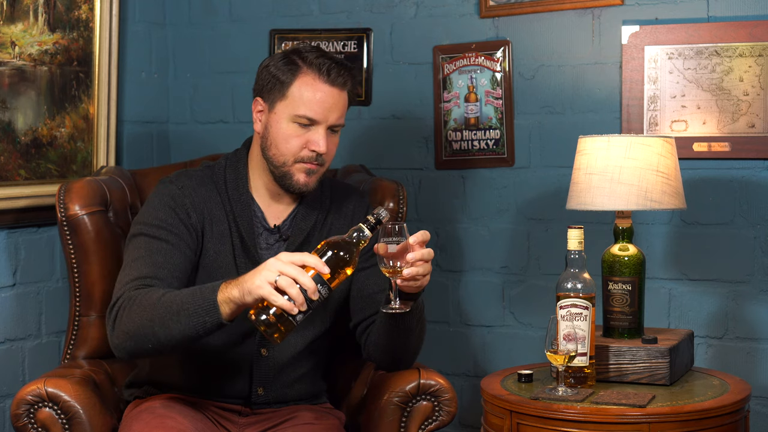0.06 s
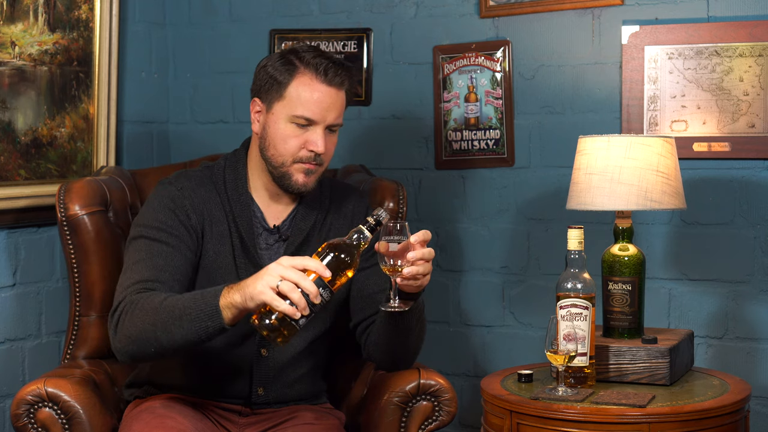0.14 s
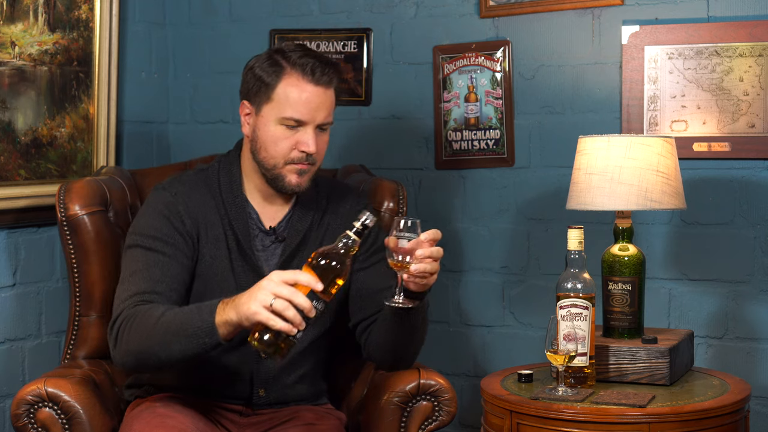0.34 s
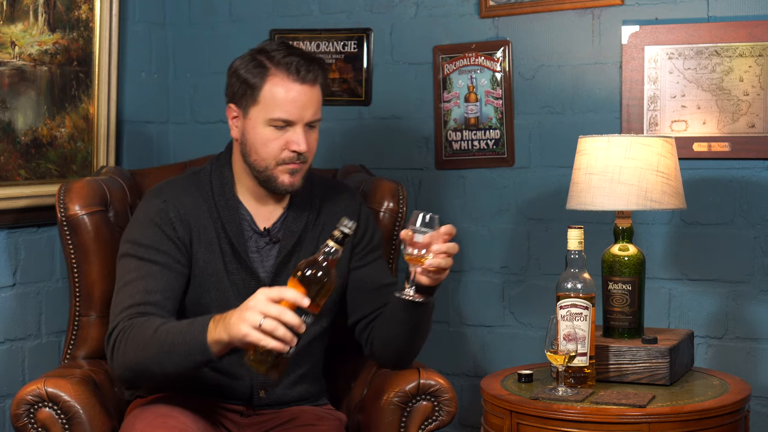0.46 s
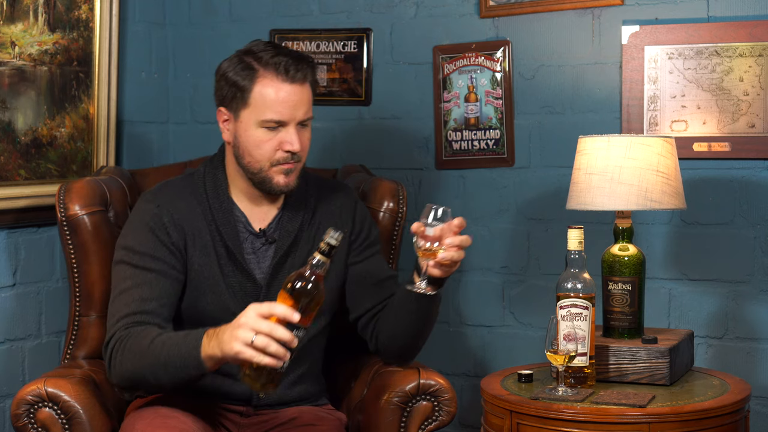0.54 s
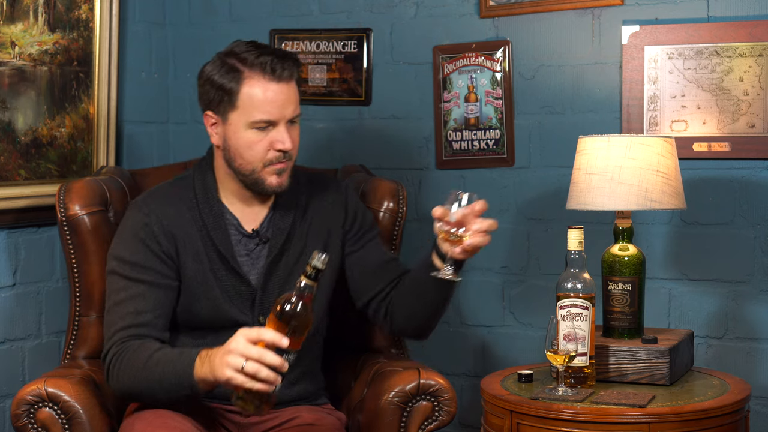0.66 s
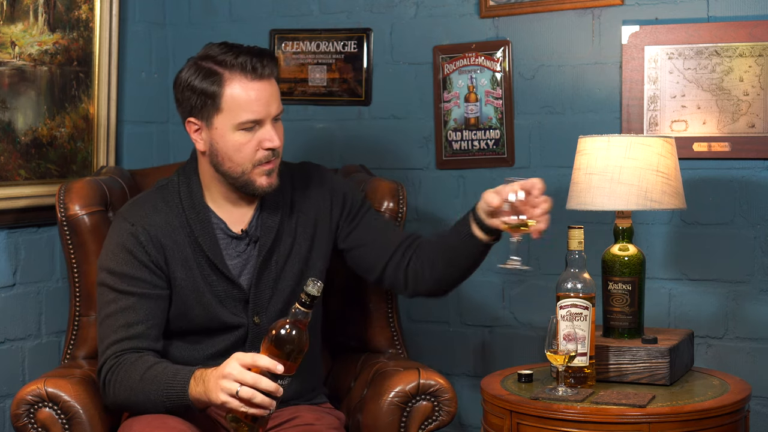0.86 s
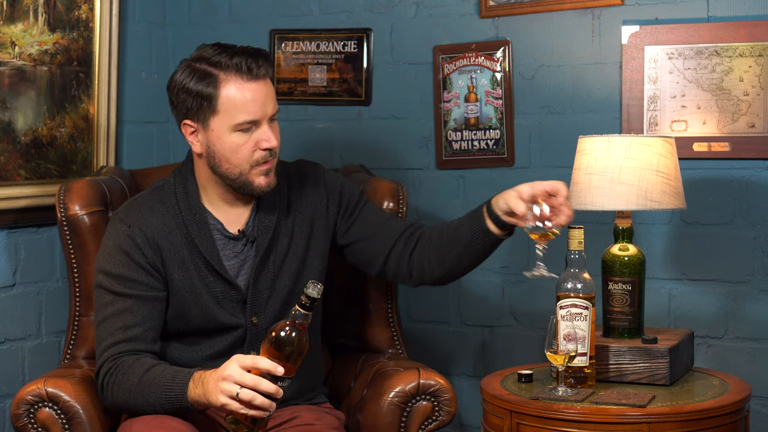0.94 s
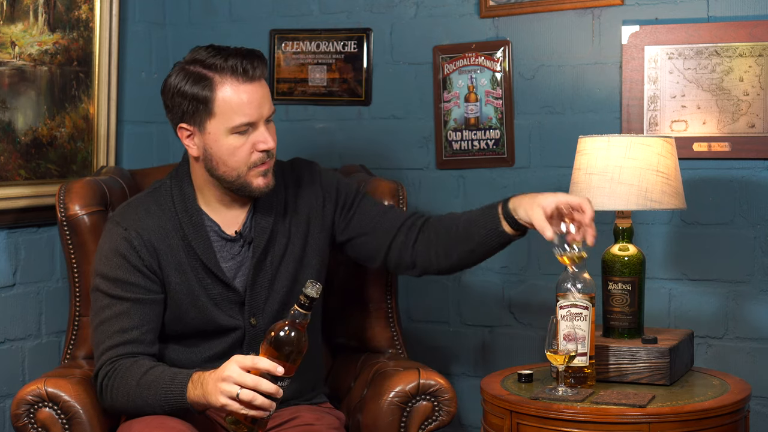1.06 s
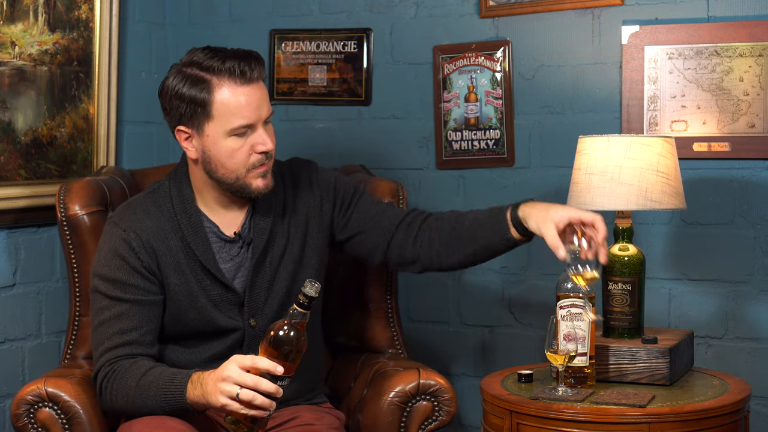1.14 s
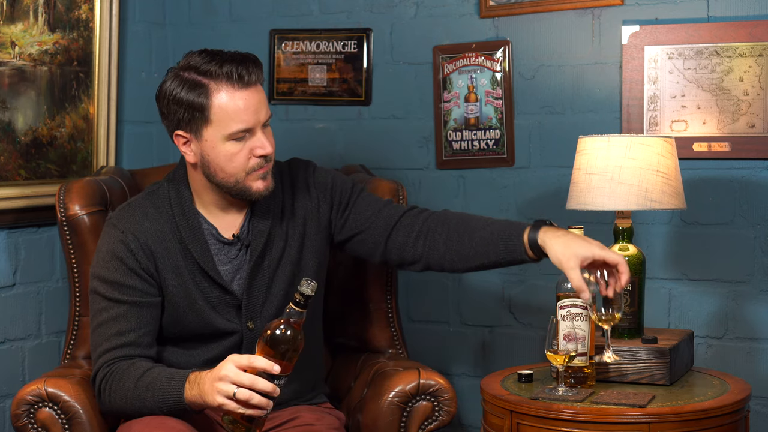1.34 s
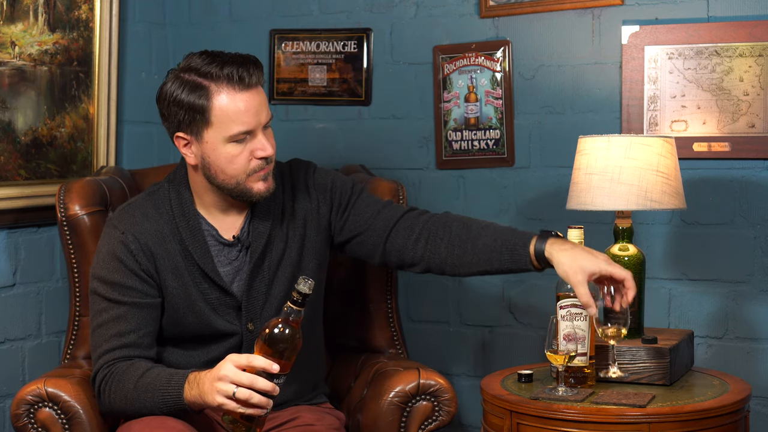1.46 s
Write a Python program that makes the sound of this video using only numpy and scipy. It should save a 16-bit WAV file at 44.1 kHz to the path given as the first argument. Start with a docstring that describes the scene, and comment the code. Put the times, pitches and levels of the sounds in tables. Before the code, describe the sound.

A bottle neck clinks once against a small stemmed glass and rings briefly. Then a woollen sleeve rustles with tiny dry clicks close to a clip-on microphone, over the faint low hum of a small room.

```python
"""One clink of a bottle neck on a small stemmed glass held in the hand, in a small furnished room.
The hard contact dies at once; glass and bottle ring a little longer, and the walls answer.
Then the arm moves away: a woollen sleeve rustles and makes tiny dry clicks close to a clip-on
microphone. Under it lies the room tone: a low rumble, a wavering hum and a faint hiss."""
import sys
import numpy as np
from scipy import signal
from scipy.fft import rfft, irfft
from scipy.io import wavfile
from scipy.ndimage import map_coordinates

SR = 44100
rng = np.random.default_rng(int(sys.argv[2]) if len(sys.argv) > 2 else 0)


def output_pcm(signal):
    """Save a mono or channel-first signal as 16-bit PCM at the path in sys.argv[1].

    Samples are clipped to [-1, 1] before scaling.
    """
    pcm = np.clip(np.atleast_2d(signal).T, -1, 1) * 32767
    wavfile.write(sys.argv[1], SR, np.round(pcm).astype(np.int16))


N = 66150
T = np.arange(N) / SR

# spectrum of a dry snap in the wool: frequency_hz, level_db
SNAP_SPECTRUM = [(150, -18), (700, -7), (1900, 0), (4400, 1), (5600, -2.5), (7100, -21), (9800, -8.5),
                 (12200, -24), (16000, -34.5)]


def amp(db):
    """Decibels to gain."""
    return 10 ** (np.asarray(db) / 20)


def unit(x):
    """Scale to rms 1."""
    return x / np.sqrt(np.mean(x ** 2) + 1e-20)


def gains(spectrum, size):
    """Gains on an FFT grid from (Hz, dB) points joined on a log frequency axis."""
    hz, db = np.transpose(spectrum)
    grid_hz = np.fft.rfftfreq(size, 1 / SR)
    return amp(np.interp(np.log(grid_hz + 1), np.log(hz + 1), db))


def noise(spectrum):
    """Coloured noise of rms 1."""
    white = rfft(rng.standard_normal(2 * N))
    return unit(irfft(white * gains(spectrum, 2 * N))[:N])


def wobble(knots_per_s):
    """A smooth random curve."""
    knots = rng.standard_normal(int(N * knots_per_s / SR) + 4)
    return map_coordinates(knots, [T * knots_per_s])


def pulse(spectrum, size=2048):
    """The shortest causal pulse with this spectrum, peak 1."""
    cepstrum = irfft(np.log(gains(spectrum, size)))
    cepstrum[1:size // 2] *= 2  # fold to minimum phase
    cepstrum[size // 2 + 1:] = 0
    shape = irfft(np.exp(rfft(cepstrum)))
    return shape / np.abs(shape).max()


def since(start_s):
    """Time since start_s, zero before it."""
    return np.maximum(T - start_s, 0)


def fade(t, attack_s, t60_s):
    """A quick rise and an exponential decay."""
    return (1 - np.exp(-t / attack_s)) * np.exp(-np.log(1000) * t / t60_s)


def glass_contact(start_s, attack_s=0.0005):
    """Glass hits glass: a bright tick of quickly damped modes with a splintery edge."""
    # modes of the contact: pitch_hz, level_db, t60_s
    modes = [(468, -38, 0.019), (2400, -24, 0.02), (4290, -14, 0.014), (4745, -7, 0.0097),
             (7180, -13.5, 0.0092), (9830, -26, 0.0063), (11450, -28.5, 0.011)]
    t = since(start_s)
    crack = amp(-45) * fade(t, attack_s, t60_s=0.0061) * rng.standard_normal(N)
    tick = sum(amp(db) * fade(t, attack_s, t60_s) * np.sin(2 * np.pi * hz * t) for hz, db, t60_s in modes)
    return crack + tick


def glass_ring(start_s, attack_s=0.0016, waver_rad=0.13):
    """Glass and bottle ring on after the strike, each mode wavering slightly in phase."""
    # modes of glass and bottle: pitch_hz, level_db, t60_s
    modes = [(773, -24.5, .125), (1295, -36, .14), (1459, -31.5, .2), (1908, -28, .205), (2353, -37, .14),
             (2540, -37, .15), (2665, -22, .17), (2692, -34, .17), (3609, -26.5, .185), (4594, -29, .19),
             (4657, -35, .24), (4694, -31, .17), (4813, -26, .145), (4935, -34, .16), (5685, -37, .15),
             (9098, -48, .14), (11470, -52, .15)]
    t = since(start_s)
    ring = np.zeros(N)
    for hz, db, t60_s in modes:
        phase = 2 * np.pi * hz * t + waver_rad * wobble(knots_per_s=91)
        ring += amp(db) * fade(t, attack_s, t60_s) * np.sin(phase)
    return ring


def clink_reflections(start_s, attack_s=0.00023):
    """The walls return the contact, hands and body scatter it, and the room adds a short diffuse tail."""
    # wall echoes: delay_s, level_db
    walls = [(.0072, -19), (.0174, -9.5), (.0318, -20), (.0402, -22)]
    # spectrum of the scattered clink: frequency_hz, level_db
    diffuse_spectrum = [(200, -34.5), (550, -12.5), (780, -1), (1080, -24), (1380, -9), (1650, -14),
                        (2100, -14), (2550, -0.5), (2950, -16.5), (3800, -23), (4250, -5), (4750, 0.5),
                        (5400, -21.5), (5750, -11), (6150, -25), (7050, -8), (7900, -23), (10000, -23.5),
                        (11600, -30.5), (13500, -48), (16000, -52)]
    t = since(start_s)
    echoes = sum(amp(db) * glass_contact(start_s + delay_s) for delay_s, db in walls)
    near_scatter = amp(-26.5) * fade(t, attack_s, t60_s=0.061) * noise(diffuse_spectrum)
    tail = amp(-26) * fade(t, attack_s, t60_s=0.19) * noise(diffuse_spectrum)
    return echoes + near_scatter + tail


def sleeve_clicks():
    """Close to the microphone, each click is one dry snap with a dull push; nothing rings."""
    # clicks of the sleeve: start_s, snap_peak_db, push_peak_db
    clicks = [(0.0704, -38, -44), (0.0923, -37.5, -56), (0.1496, -39, -53), (0.1908, -36, -51),
              (0.3802, -30.5, -54), (0.409, -40, -52), (.5161, -38.5, -24), (0.5629, -37, -58),
              (0.618, -40, -55), (0.6471, -29, -58), (.6558, -42, -62), (0.6702, -43, -49),
              (0.6704, -54, -63), (.7141, -43, -58), (.7280, -19.5, -49), (1.2351, -43.5, -66)]
    # spectrum of the dull push: frequency_hz, level_db
    push_spectrum = [(80, -34), (450, 3), (900, -1.5), (2000, -10.5), (2900, -24), (4500, -13), (8500, -15),
                     (12000, -29.5), (16000, -41)]
    snap, push = pulse(SNAP_SPECTRUM), pulse(push_spectrum)
    out = np.zeros(N + SR)
    for start_s, snap_db, push_db in clicks:
        out[round(start_s * SR):][:len(snap)] += amp(snap_db) * snap + amp(push_db) * push
    return out[:N]


def sleeve_rustle(grain_db=2, catches_per_s=700, snaps_per_s=100):
    """Wool slides with a grainy swish and a soft low rub, while single fibres snap."""
    # movement of the arm: time_s, swish_db, rub_db
    movement = [(0, -66, -65), (.2, -62, -61), (.3, -62, -63), (.36, -57.5, -51), (0.442, -55.5, -55.5),
                (.51, -55, -51.5), (.55, -58.5, -61.5), (.61, -64, -63), (.72, -62.5, -59.5),
                (.77, -62, -62), (.82, -58.5, -62.5), (.93, -63.5, -65.5), (1.1, -65, -65.5),
                (1.3, -68, -74), (1.5, -72, -98)]
    # spectrum of sliding wool: frequency_hz, level_db
    swish_spectrum = [(300, 0), (1200, -4), (2200, -2), (4200, 1), (6500, -4), (10000, -8.5), (13000, -18),
                      (16000, -26)]
    # spectrum of the low rubbing: frequency_hz, level_db
    rub_spectrum = [(50, -19), (95, -1), (160, 2), (330, 1.5), (600, -4), (1200, -8.5), (2200, -10),
                    (5000, -40), (16000, -64)]
    time_s, swish_db, rub_db = np.transpose(movement)
    swish = unit(noise(swish_spectrum) * amp(grain_db * wobble(catches_per_s)))
    snaps = (rng.random(N) < snaps_per_s / SR) * rng.standard_normal(N)
    crackle = amp(6.5) * signal.fftconvolve(snaps, pulse(SNAP_SPECTRUM))[:N]
    rub = amp(np.interp(T, time_s, rub_db)) * noise(rub_spectrum)
    return amp(np.interp(T, time_s, swish_db)) * (swish + crackle) + rub


def microphone_bumps(rise_s=0.0028):
    # cloth bumps: start_s, peak_db, pitch_hz
    bumps = [(.483, -40.5, 161), (0.675, -45, 124), (.7315, -39.5, 158), (.942, -41, 162)]
    out = np.zeros(N)
    for start_s, db, hz in bumps:
        t = since(start_s)
        envelope = t / rise_s * np.exp(1 - t / rise_s)
        out += amp(db) * envelope * np.sin(2 * np.pi * hz * t)
    return out


def handling_taps():
    """Faint pitched taps of handling, a few cycles long."""
    # soft taps: start_s, level_db, pitch_hz
    taps = [(0.6747, -35.5, 2440), (1.23, -43.5, 2400)]
    out = np.zeros(N)
    for start_s, db, hz in taps:
        t = since(start_s)
        out += amp(db) * fade(t, attack_s=1 / hz, t60_s=0.0058) * np.sin(2 * np.pi * hz * t)
    return out


def room_tone(swing_db=1, waver_rad=0.45):
    """The room's background: three wavering hum tones, a low rumble and a thin hiss."""
    # tones of the hum: pitch_hz
    hum_pitches = [42, 69, 118.4]
    # rms course of each hum tone: time_s, low_tone_db, middle_tone_db, high_tone_db
    hum_levels = [(0, -55.5, -54.5, -57), (.15, -51, -62.5, -61.5), (.35, -61.5, -49, -63.5),
                  (.5, -50, -60, -60.5), (.8, -55.5, -63, -54.5), (1.0, -48, -57, -66.5),
                  (1.25, -52.5, -71, -56.5), (1.5, -62.5, -58, -58)]
    # spectrum of the rumble: frequency_hz, level_db
    rumble_spectrum = [(12, -37), (25, -3.5), (42, -1), (55, -23.5), (70, 0.5), (88, -13), (118, -6.5),
                       (140, -9.5), (165, -8), (210, -15.5), (400, -23.5), (800, -31.5), (2000, -52)]
    # spectrum of the hiss: frequency_hz, level_db
    hiss_spectrum = [(200, -19.5), (1200, -1), (1480, 4.5), (1620, 14), (1850, -2.5), (2500, -2),
                     (5000, -1), (9000, 0.5), (13000, -10.5), (16000, -13.5)]
    time_s, *tone_levels = np.transpose(hum_levels)
    hum = np.zeros(N)
    for hz, db in zip(hum_pitches, tone_levels):
        level_db = np.interp(T, time_s, db) + swing_db * wobble(knots_per_s=3.56)
        phase = 2 * np.pi * (hz * T + rng.random()) + waver_rad * wobble(knots_per_s=3.4)
        hum += np.sqrt(2) * amp(level_db) * np.sin(phase)
    return hum + amp(-53.5) * noise(rumble_spectrum) + amp(-67) * noise(hiss_spectrum)


def scene():
    """Clink, sleeve and room at one clip-on microphone."""
    strike_s = 0.2289
    clink = glass_ring(strike_s) + clink_reflections(strike_s) + glass_contact(strike_s)
    mix = clink + room_tone() + sleeve_clicks() + sleeve_rustle() + microphone_bumps() + handling_taps()
    return mix[None]


def record(dry):
    """The recorder keeps nothing above its band limit."""
    top_hz = 15900
    passband = np.fft.rfftfreq(2 * N, 1 / SR) < top_hz
    return irfft(rfft(dry, 2 * N) * passband)[..., :N]


dry = scene()
out = record(dry)
output_pcm(out)
```